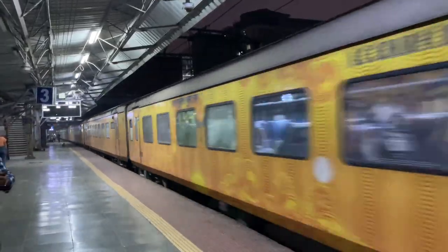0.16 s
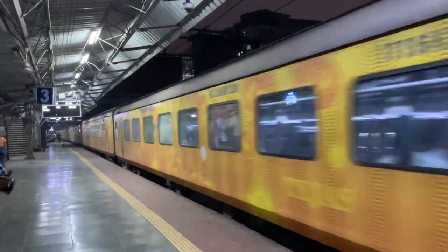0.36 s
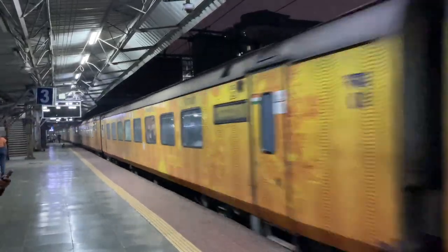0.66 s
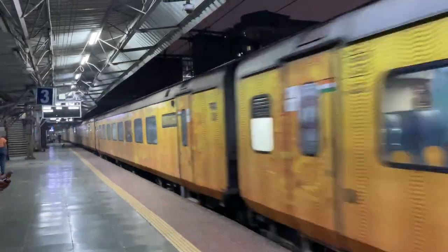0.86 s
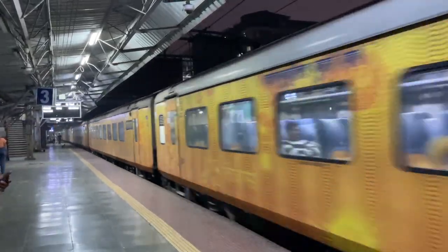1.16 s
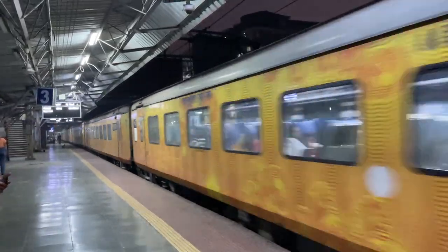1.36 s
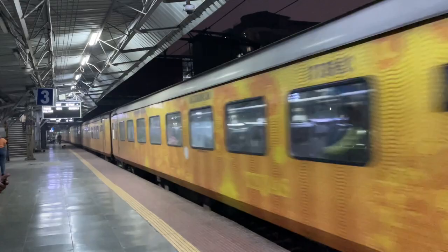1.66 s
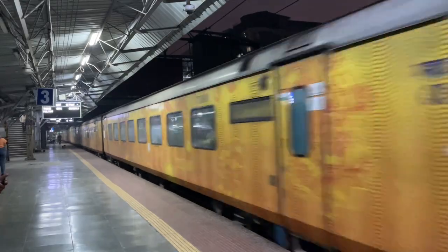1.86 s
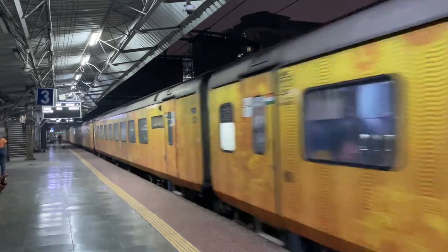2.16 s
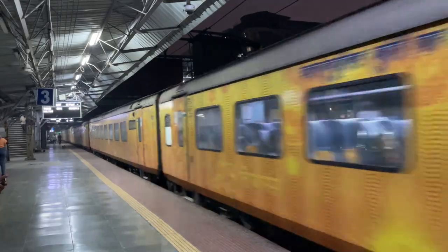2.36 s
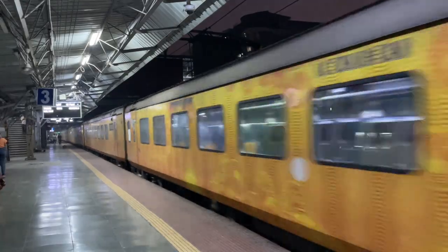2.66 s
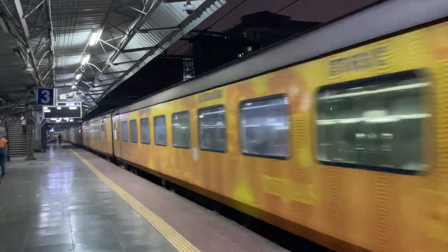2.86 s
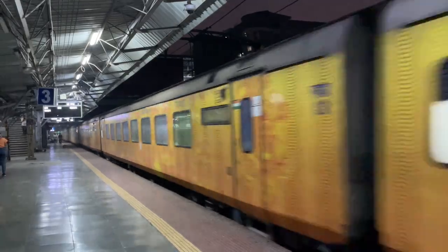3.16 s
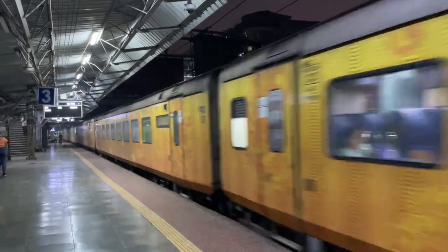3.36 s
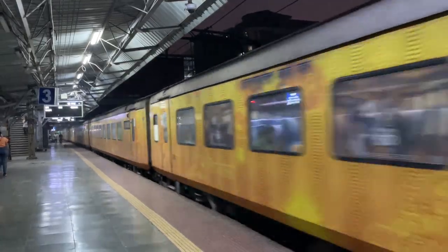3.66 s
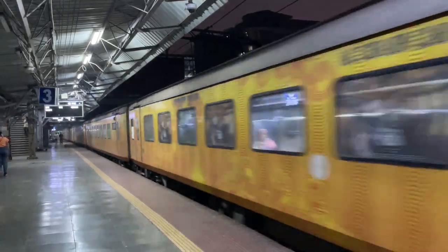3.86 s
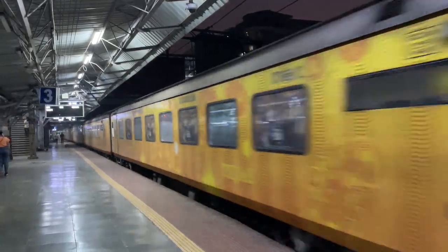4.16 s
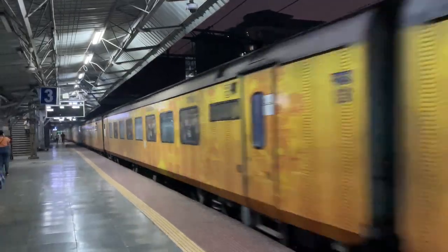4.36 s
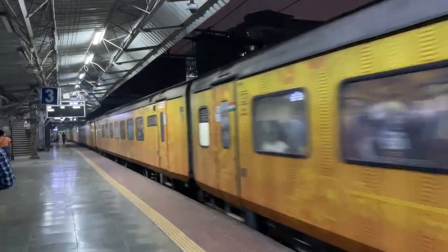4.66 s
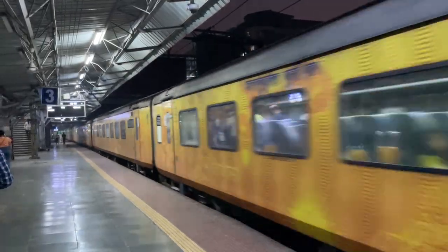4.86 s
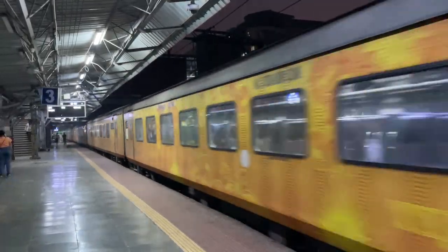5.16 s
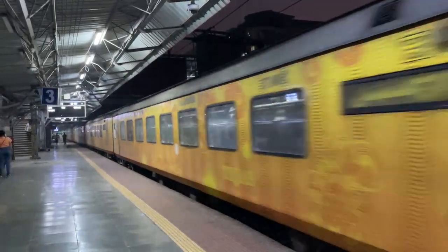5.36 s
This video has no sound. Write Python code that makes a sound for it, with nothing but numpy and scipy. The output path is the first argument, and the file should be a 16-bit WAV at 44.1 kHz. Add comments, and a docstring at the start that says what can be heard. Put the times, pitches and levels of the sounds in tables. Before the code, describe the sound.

Passenger coaches rush past a roofed platform, heard close on a small stereo microphone. From 0 s there is continuous rumble, mid roar and fine hiss, with rails singing very faintly; a light axle knock falls at 0.1 s. Low thumps with short steel pings come at 0.6 and 0.7 s, then clattering joints near 1.35 and 1.5 s. The roar swells from 1.8 s into heavy, overlapping thumps, with a gritty crack at 1.96 s, a bright ringing wheel clank at 2.1 s and a much fainter one at 2.4 s. Another crack comes at 2.7 s. From 2.55 to 4.35 s a hollow drone rises and falls in pitch, strongest around 3 to 3.3 s with rapid throbs and a rattling ping near 3.07 s. Knocks at 3.9 and 4.4 s lead into lighter rolling, low throbs around 5.1 s and a last joint knock at 5.46 s, still moving at the 5.5 s end.

```python
"""Passenger coaches rush along a roofed station platform, close to a small two-port microphone.
From 0 s layered noise rumbles, roars and hisses, rails ring faintly; axles knock over joints from 0.1 s.
From 0.6 s decaying low tones thump and throb, and rattling resonances ping; gritty cracks come from 1.96 s.
At 2.1 and 2.4 s blows ring whole wheels; from 2.55 to 4.35 s a passing bogie drones as sliding
resonant noise. The rolling goes on to the end at 5.5 s."""
import sys
import numpy as np
from scipy import signal
from scipy.io import wavfile
from scipy.ndimage import uniform_filter1d

SR = 44100
rng = np.random.default_rng(int(sys.argv[2]) if len(sys.argv) > 2 else 0)


def put_to_file(sound):
    """Save the sound as 16-bit audio at rate SR, in the file named by the first command-line argument."""
    columns = np.atleast_2d(sound).T  # one column per channel
    safe = np.clip(columns, -1, 1)
    whole_steps = np.round(safe * 32767)
    wavfile.write(sys.argv[1], SR, whole_steps.astype(np.int16))


N = 242991


def gain_of(db):
    """Amplitude factor of a level in dB."""
    return 10 ** (np.asarray(db) / 20)


def evened(x):
    """Scales to rms 1."""
    return x / np.sqrt(np.mean(x ** 2) + 1e-20)


def smoothed_twice(x, size, second_size):
    """Two running means along the last axis."""
    return uniform_filter1d(uniform_filter1d(x, size=size), size=second_size)


def read_curve(points, hz):
    """Interpolates (Hz, value) points over log frequency."""
    point_hz, value = np.transpose(points)
    return np.interp(np.log(hz + 1), np.log(point_hz + 1), value)


def add(mix, start_s, sound):
    """Adds a sound in place, cut off at the end of the mix."""
    part = mix[..., round(start_s * SR):][..., :sound.shape[-1]]
    part += sound[..., :part.shape[-1]]


def blow(rise_s, t60_s):
    """Half-second envelope of a knock: soft rise, exponential fall."""
    t = np.arange(SR // 2) / SR
    return (1 - np.exp(-(t / rise_s) ** 2)) * gain_of(-60 * t / t60_s)


def resonate(x, hz, width_hz):
    """Resonance of gain 1: shifts the pitch curve hz to zero, smooths, shifts back."""
    turn = np.exp(2j * np.pi * np.cumsum(hz * np.ones(x.shape[-1])) / SR)
    pole = np.exp(-np.pi * width_hz / SR)
    return 2 * (turn * signal.lfilter([1 - pole], [1, -pole], x / turn)).real


# Band edges of the seven noise layers, rumble to hiss, in Hz.
LAYER_EDGES_HZ = [0, 90, 230, 550, 1200, 3300, 5500, 22050]
# Colour of the ports' sum below the hiss. Each row: Hz, relative dB per Hz (layers are levelled later).
SUM_COLOUR = [(20, -28), (38, -30), (55, 1.5), (75, 1.5), (100, -7), (150, 6), (250, 2), (380, -0.5),
              (600, -7.5), (900, -11), (1020, -15), (1180, -18), (1390, -21.5), (2040, -24.5), (2330, -23),
              (3130, -30.5), (4500, -33.5), (5500, -42.5), (7150, -64)]
# Colour of the sum in the hiss; the ports cancel near 8 kHz. Each row: Hz, relative dB per Hz.
SUM_HISS_COLOUR = [(2940, -13), (5000, 1.5), (6390, 2), (7350, -3.5), (7700, -10.5), (8250, -39),
                   (8750, -19.5), (9100, -9.5), (10000, -8), (11900, -10), (12800, -16), (13600, -18)]
# Ports' difference against their sum, below the hiss. Each row: Hz, dB.
DIFFERENCE_OVER_SUM = [(30, -23), (70, -23), (130, -15), (270, -10.5), (550, -4), (1000, -4.5), (2000, 0),
                       (4000, -5), (5400, -5.5)]
# Colour of the difference in the hiss, before its lift; cancels near 11.5 kHz.
# Each row: Hz, relative dB per Hz.
DIFFERENCE_HISS_COLOUR = [(2940, -29), (5000, -6), (6260, -10.5), (7830, -6.5), (9760, -15.5), (10300, -21),
                          (10600, -40), (11500, -62), (12300, -45), (12800, -25), (13800, -26),
                          (15000, -22), (15700, -40)]
DIFFERENCE_HISS_LIFT_DB = 7.5
# Share of the difference that is the sum turned a quarter cycle, as one port hears the train first.
# Each row: Hz, share from -1 to 1.
QUARTER_TURN = [(600, -0.03), (800, .13), (1300, 0.1), (1800, -0.4), (2250, -.08), (2700, .32), (3200, .27),
                (3700, .03), (4300, .05), (5000, .27), (5700, -.18), (6400, -.5), (7100, -.62), (7600, -.5),
                (8100, 0), (8700, .38), (9200, .65), (9700, .7), (10400, .25), (11000, 0), (12300, 0),
                (13000, -.32)]


def steel_noise(patchy_db=1.9):
    """Layers of patchy noise, each as (sum, difference) of the ports, the sum at rms 1."""
    hz, _, spectrum = signal.stft(rng.standard_normal((2, N)), SR, nperseg=2048, noverlap=1536)
    patches = uniform_filter1d(rng.standard_normal(spectrum.shape[1:]), size=6, axis=0)
    patches = evened(uniform_filter1d(patches, size=8, axis=1))
    turned = np.clip(read_curve(QUARTER_TURN, hz), -1, 1)[:, None]
    difference = 1j * turned * spectrum[0] + np.sqrt(1 - turned ** 2) * spectrum[1]
    spectrum = np.array([spectrum[0], difference]) * gain_of(patchy_db * patches)
    sum_db = read_curve(SUM_COLOUR, hz)
    body = gain_of([sum_db, sum_db + read_curve(DIFFERENCE_OVER_SUM, hz)])
    difference_hiss_db = read_curve(DIFFERENCE_HISS_COLOUR, hz) + DIFFERENCE_HISS_LIFT_DB
    hiss = gain_of([read_curve(SUM_HISS_COLOUR, hz), difference_hiss_db])
    layers = []
    for low_hz, high_hz in zip(LAYER_EDGES_HZ, LAYER_EDGES_HZ[1:]):
        outside = (hz / high_hz) ** 8 + (low_hz / (hz + 1)) ** 8
        colour = (hiss if high_hz > SR / 4 else body) / np.sqrt(1 + outside)
        layer = signal.istft(spectrum * colour[..., None], SR, nperseg=2048, noverlap=1536)[1][:, :N]
        slow_power = smoothed_twice(layer[0] ** 2, 4000, 4000)
        layers.append(layer / np.sqrt(slow_power))  # many wheels at once keep the slow level steady
    return np.array(layers)


# Wavering rail resonances. Each row: pitch in Hz, width in Hz, level in dB.
RAIL = [(853, 170, -36.5), (1823, 46, -51), (2308, 190, -47.5), (2500, 150, -51.5), (2750, 830, -57),
        (4400, 150, -71)]


def rail(shaking, waver=0.0056, swell_db=1.2):
    """The rail sings faintly at a few pitches that drift and swell at random, louder when the wheels shake it."""
    out = np.zeros((2, N))
    for hz, width_hz, db in RAIL:
        drift, swell = (evened(smoothed_twice(v, 6000, 3000)) for v in rng.standard_normal((2, N)))
        song = resonate(rng.standard_normal((2, N)), hz * (1 + waver * drift), width_hz)
        song = resonate(song, hz, 310)
        out += gain_of(db + swell_db * swell) * evened(song)
    return out * evened(shaking)


# Swings of the rolling noise that the layers follow.
# Each row: time in seconds, treble level in dB, low roar level in dB.
ROLLING = [(0, -41.5, -35), (.3, -40.5, -35), (.55, -40, -37), (.65, -40, -32.5), (.8, -37, -32),
           (1.0, -38.5, -35.5), (1.15, -38.5, -32.5), (1.33, -39.5, -35), (1.44, -37, -31),
           (1.55, -36.5, -30.5), (1.76, -37, -30), (1.8, -37, -30), (1.9, -33, -28.5), (1.95, -33.5, -28),
           (2.05, -32.5, -26), (2.18, -35.5, -28), (2.235, -33, -32), (2.28, -35, -29),
           (2.34, -36.5, -29.5), (2.44, -35, -28), (2.52, -35, -25), (2.6, -35.5, -27), (2.8, -35.5, -26),
           (2.95, -35, -26.5), (3.06, -34, -25), (3.13, -33.5, -24.5), (3.27, -34, -26), (3.4, -35.5, -25),
           (3.75, -37.5, -28), (3.86, -36, -29), (4.0, -35, -28.5), (4.15, -35.5, -28.5), (4.3, -37, -28),
           (4.5, -35, -28.5), (4.7, -37, -32), (4.95, -39, -31), (5.07, -37, -31), (5.2, -36, -28),
           (5.4, -37, -31), (5.51, -35.5, -28.5)]
# Ground rumble, the lowest layer. Each row: time in seconds, level in dB.
RUMBLE = [(0, -35.5), (.35, -33), (.5, -37.5), (1.1, -32.5), (1.4, -33), (1.6, -36), (1.8, -31),
          (1.92, -32), (2.03, -25), (2.14, -29), (2.35, -29), (2.45, -33), (2.7, -29.5), (2.95, -32.5),
          (3.1, -33), (3.22, -33), (3.35, -32), (3.45, -34.5), (3.65, -32.5), (3.9, -42), (4.2, -37),
          (4.4, -36), (4.6, -34.5), (4.85, -33), (5.15, -35.5), (5.25, -34.5), (5.51, -27.5)]
# The other six layers, sleepers to hiss. Each row: dB over the level followed,
# share of treble against roar (0-1), how far the layer follows its swings (1 = fully).
FOLLOW = [(1, 0.47, 0.9), (2, 0.22, 0.85), (-0.5, 0, 0.87), (-0.5, 0.93, 0.99), (-7, 0.93, 1.1),
          (-15, 0.92, 1.02)]
# Levels the swings are counted from: treble in dB, roar in dB.
MIDDLE_DB = [-36.5, -29.5]
# Axles over joints. Each row: start in seconds, hiss of the knock in dB, weight in the rail roar in dB,
# clatter of the wheels in dB, rush of air in dB.
JOINTS = [(0.0994, -57, -30, -54, -58), (0.5806, -49, -33, -53, -61), (0.7144, -49.5, -38, -45, -51),
          (1.3513, -49, -46, -38, -56), (1.4774, -49, -46, -48, -54), (1.82, -45, -26, -39, -47),
          (1.834, -46, -25, -35, -45), (1.9614, -41, -27, -38, -36), (2.104, -40, -28, -31, -31),
          (2.122, -44, -30, -33, -50), (2.253, -44, -15, -35, -43), (2.4014, -46, -24, -29, -57),
          (2.5844, -46.5, -29, -33, -49), (2.7, -56, -34, -42, -52), (2.7101, -45, -34, -47, -57),
          (2.76, -55, -23, -45, -55), (2.8144, -46.5, -20.5, -32, -47), (3.0594, -61, -13.5, -37, -55),
          (3.12, -58, -16.5, -32, -50), (3.185, -52, -15, -31, -51), (3.23, -58, -17, -31, -50),
          (3.52, -60, -21, -40, -41), (3.8008, -47.5, -48, -48, -54), (3.913, -39, -24, -48, -50),
          (4.2622, -46.5, -43, -50, -55), (4.3994, -48, -30, -37, -43), (4.434, -47, -40, -40, -41),
          (4.452, -55, -45, -47, -45), (5.0054, -45, -40, -44, -54), (5.1347, -46, -39, -48, -43),
          (5.4615, -41.5, -20, -43, -50)]
# Rise of the four knock parts: hiss, roar, clatter, rush, in seconds.
JOINT_RISE_S = [0.00065, 0.0092, 0.0035, 0.0039]
# Fall of the same four parts by 60 dB, in seconds.
JOINT_T60_S = [0.59, 0.2, 0.38, 0.54]
# Left-right lean of each layer below the hiss, in dB, added to the lean over time.
LAYER_LEAN_DB = [1, -0.5, -0.5, 2.5, -1, 8]
# Lean over time, for the same layers. Each row: time in seconds, left-right in dB.
LEAN = [(0, -1.5), (.8, -1.5), (1.7, -2.5), (2.8, -2.5), (3.5, -0.5), (4.6, -1), (5.2, -1.5), (5.51, -4)]


def rolling():
    """Rolling noise; each joint shakes the same rail and wheels harder for a moment."""
    t = np.arange(N) / SR
    s, *levels_db = np.transpose(ROLLING)
    treble_db, roar_db = (np.interp(t, s, column) for column in levels_db)
    layers_db = [np.interp(t, *np.transpose(RUMBLE))]
    for offset_db, share, reach in FOLLOW:
        share = np.clip(share, 0, 1)
        middle_db = share * MIDDLE_DB[0] + (1 - share) * MIDDLE_DB[1]
        swing_db = share * treble_db + (1 - share) * roar_db - middle_db
        layers_db.append(offset_db + middle_db + reach * swing_db)
    power = gain_of(layers_db) ** 2
    shaken = power[6], power[3], power[4], power[5]  # hiss, roar, clatter, rush
    for start_s, *knock_db in JOINTS:
        for layer_power, db, rise_s, t60_s in zip(shaken, knock_db, JOINT_RISE_S, JOINT_T60_S):
            add(layer_power, start_s, (gain_of(db) * blow(rise_s, t60_s)) ** 2)
    layers = np.sqrt(power)[:, None] * steel_noise()
    lean_db = np.interp(t, *np.transpose(LEAN))
    for layer, db in zip(layers, LAYER_LEAN_DB):
        ratio = gain_of(db + lean_db)
        # a louder left port puts some of the sum into the difference
        layer[1] += layer[0] * (ratio - 1) / (ratio + 1)
    return layers.sum(0) + rail(np.sqrt(power[4]))


# Low thumps of near and distant axles, and throbs of the passing drone.
# Each row: start in seconds, main tone level in dB before its envelope,
# pitch settled on in Hz, overtones against the main tone in dB.
THUMPS = [(0.609, -13, 72.5, -9), (0.734, -14.5, 73.6, -22), (1.678, -10, 70, -34),
          (1.827, -5.5, 106.8, -3), (1.846, -15, 192, -8), (1.963, -3.5, 115.4, -5), (1.999, -9, 133, -9),
          (2.034, -13, 143, -11), (2.113, -7, 133.2, -6), (2.152, -14, 148.7, -4), (2.204, -13.5, 217, -24),
          (2.253, -4, 128.7, -8), (2.288, -9, 136, -24), (2.401, -3.5, 150, -12), (2.547, -3.5, 160.4, -12),
          (2.668, -17, 228, -23), (2.714, -10, 235, -27), (2.779, -7, 250, -17), (2.83, -13, 250, -11),
          (2.865, -8, 185, -25), (2.925, -6.5, 226, -18), (2.99, -7, 280, -15), (3.036, -14.5, 68, -18),
          (3.11, -6.5, 385, -15), (3.191, -10, 312, -22), (3.236, -18, 70, -25), (3.745, -13, 192, -23),
          (4.772, -11, 220, -17), (4.836, -16, 180, -20), (5.06, -15, 382, -20), (5.092, -18, 224, -19),
          (5.168, -15, 221, -16), (5.291, -15, 200, -22), (5.325, -16, 251, -18)]
# Overtones. Each row: times the pitch, dB added to the thump's overtone level, t60 in seconds.
TRACK_BED = [(1.75, 6, 0.05), (2.5, -4.5, 0.16), (3.5, -4.5, 0.13), (4.9, -7.5, 0.052)]
# Deep push under each thump: times the pitch, dB against the main tone, t60 in seconds.
GROUND_PUSH = [0.618, -9, 0.092]
THUMP_CYCLES, THUMP_FLOOR_S = 4, 0.068  # main tone t60: floor plus so many cycles
THUMP_LAG_CYCLES = 0.76  # main tone and push follow the overtones


def thuds():
    """Low decaying tones, sagging in pitch: thumps under near and far axles, and throbs of the drone."""
    out, t = np.zeros(N), np.arange(SR // 2) / SR
    push_times, push_db, push_t60_s = GROUND_PUSH
    phases = rng.random((len(THUMPS), 2 + len(TRACK_BED)))  # in cycles
    for (start_s, db, pitch_hz, over_db), starts in zip(THUMPS, phases):
        late_s = start_s + THUMP_LAG_CYCLES / pitch_hz
        tones = [(late_s, pitch_hz, db, THUMP_FLOOR_S + THUMP_CYCLES / pitch_hz),
                 (late_s, pitch_hz * push_times, db + push_db, push_t60_s)]
        tones += [(start_s, pitch_hz * times, db + over_db + mode_db, t60_s)
                  for times, mode_db, t60_s in TRACK_BED]
        for (at_s, hz, tone_db, t60_s), phase in zip(tones, starts):
            turns = hz * (t + 0.001 * (1 - np.exp(-t / 0.0087)))  # starts about 11 % sharp
            tone = np.sin(2 * np.pi * (turns + phase))
            add(out, at_s, gain_of(tone_db) * blow(0.6 / hz, t60_s) * tone)
    return out


def ring(hz, width_hz, rattle):
    """One steel mode set going by a rattling burst, so that it wavers; peak 1 in the sum."""
    sound = resonate(resonate(rattle, hz, width_hz), hz, 220)
    return sound / abs(sound[0]).max()


# Blows that ring a whole wheel. Each row: start in seconds, level in dB.
CLANKS = [(2.108, -24.5), (2.122, -26.5), (2.40, -46)]
# Modes of the wheel. Each row: pitch in Hz, peak against the clank's level in dB,
# t60 of the rattle in seconds.
WHEEL = [(1440, -3, .2), (1574, 0, 0.38), (1785, 1.5, 0.44), (2300, -2, 0.35), (2690, -2, 0.55),
         (3270, -12, 0.17), (4040, -16, .2), (4650, -8, 0.25), (5200, -27, 0.18)]
# Short rings of one pitch. Each row: start in seconds, peak in dB, pitch in Hz,
# t60 of the burst in seconds.
PINGS = [(.625, -26.5, 341, 0.12), (.635, -22, 608, 0.083), (.735, -29, 790, .25), (.755, -25, 424, 0.13),
         (.8, -24, 409, 0.35), (1.28, -34, 2420, .2), (1.552, -29, 2390, 0.1), (1.962, -15.5, 530, 0.066),
         (2.112, -28, 2760, 0.2), (2.145, -24, 2340, 0.37), (2.255, -18, 872, 0.13), (2.41, -21, 923, .15),
         (2.756, -20, 536, 0.26), (2.815, -24, 1585, 0.28), (3.065, -25, 565, .12), (3.072, -12, 905, 0.11),
         (3.16, -24, 1780, 0.21), (3.12, -20.5, 764, 0.29), (3.175, -16.5, 800, 0.24),
         (3.205, -21, 767, 0.18), (3.235, -17, 871, 0.12), (3.915, -22, 715, 0.18),
         (3.945, -21.5, 809, 0.16), (3.955, -21, 538, 0.54), (4.005, -30, 940, .15), (4.44, -36, 4000, .2),
         (4.662, -39, 1760, .34)]
# Gritty cracks of a wheel on a rail end. Each row: start in seconds, peak in dB, centre in Hz,
# t60 of the burst in seconds, width as a share of the centre.
CRACKS = [(1.9628, -18, 750, 0.044, 0.75), (2.121, -21, 2200, 0.19, 0.72), (2.7062, -20, 880, 0.074, 0.45),
          (2.72, -27, 990, .06, .6), (4.433, -29.5, 4000, 0.071, 0.22), (4.451, -28, 4100, 0.068, .2)]
# The wheel rattles on, which widens its modes.
PING_WIDTH_SHARE, CLANK_WIDTH_HZ = 0.06, 180  # share of the pitch; Hz
PING_STEADY = 0.1  # clean tone against rattle


def clanks():
    """Full wheel clanks, single pings and gritty cracks: decaying noise bursts through steel modes or a band."""
    out, t = np.zeros((2, N)), np.arange(SR // 3) / SR

    def noise():
        return rng.standard_normal((2, len(t)))

    for start_s, db, hz, t60_s in PINGS:
        tone = PING_STEADY * np.sin(2 * np.pi * (hz * t + rng.random((2, 1))))
        rattle = blow(0.0031, t60_s)[:len(t)] * (tone + noise())
        add(out, start_s, gain_of(db) * ring(hz, PING_WIDTH_SHARE * hz, rattle))
    for start_s, db, hz, t60_s, width in CRACKS:
        band_hz = [hz / (1 + width), hz * (1 + width)]
        crack = blow(0.0017, t60_s)[:len(t)] * noise()
        crack = signal.sosfilt(signal.butter(3, band_hz, "bandpass", fs=SR, output="sos"), crack)
        add(out, start_s, gain_of(db) * crack / abs(crack[0]).max())
    for start_s, db in CLANKS:
        for hz, mode_db, t60_s in WHEEL:
            rattle = blow(0.0017, t60_s)[:len(t)] * noise()
            add(out, start_s, gain_of(db + mode_db) * ring(hz, CLANK_WIDTH_HZ, rattle))
    return out * [[1], [0.7]]  # sum, difference


# Drone of a passing bogie. Each row: time in seconds, gain in dB, centre in Hz.
DRONE = [(2.55, -44, 230), (2.7, -21, 220), (2.9, -26, 253), (3.0, -17.5, 284), (3.04, -22.5, 370),
         (3.12, -19, 373), (3.16, -21, 366), (3.2, -22.5, 317), (3.27, -15.5, 272), (3.33, -20.5, 278.7),
         (3.45, -34, 250), (3.7, -28, 210), (3.78, -24, 200), (3.86, -34, 209), (3.98, -24, 234),
         (4.09, -23, 273), (4.2, -25, 213), (4.35, -38, 200)]


def drone():
    """Noise in a hollow resonance that slides as the bogie goes by."""
    s, *columns = np.transpose(DRONE)
    t = np.arange(s[0], s[-1], 1 / SR)
    db, hz = (np.interp(t, s, column) for column in columns)
    hum = resonate(rng.standard_normal((2, len(t))), hz, 120)
    hum = evened(resonate(hum, hz, 144))
    # several wheels keep it from lumping
    hum = hum / np.sqrt(uniform_filter1d(hum[0] ** 2, size=1800) + 0.53)
    faded = gain_of(db) * hum * signal.windows.tukey(len(t), 0.08)
    out = np.zeros((2, N))
    add(out, s[0], faded * [[1], [0.35]])  # sum, difference
    return out


def scene():
    """Sum and difference of the two ports become left and right."""
    both, apart = rolling() + thuds() * [[1], [-0.08]] + clanks() + drone()
    return np.array([both + apart, both - apart])


LOW_CUT_HZ = 27
CEILING = 0.95  # full scale = 1
# Upper band limits: sum in Hz, difference in Hz.
BAND_LIMIT_HZ = [13650, 15700]


def record(dry):
    """Small-microphone bass roll-off, soft ceiling on the peaks, own band limits for sum and difference."""
    dry = signal.sosfilt(signal.butter(4, LOW_CUT_HZ, "highpass", fs=SR, output="sos"), dry)
    dry = dry / (1 + (dry / CEILING) ** 6) ** (1 / 6)
    limits = np.array([signal.firwin(511, hz, window=("kaiser", 9), fs=SR) for hz in BAND_LIMIT_HZ])
    ports = np.array([dry[0] + dry[1], dry[0] - dry[1]]) / 2
    both, apart = signal.oaconvolve(ports, limits, "same", axes=1)
    return np.array([both + apart, both - apart])


dry = scene()
out = record(dry)
put_to_file(out)
```